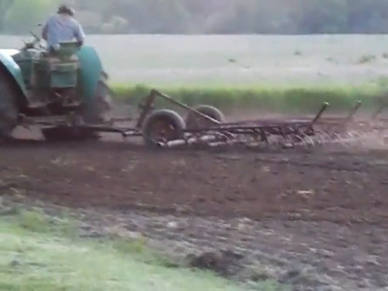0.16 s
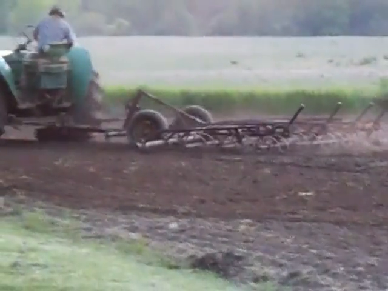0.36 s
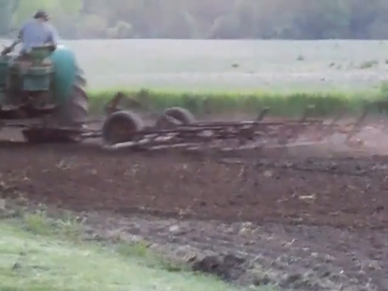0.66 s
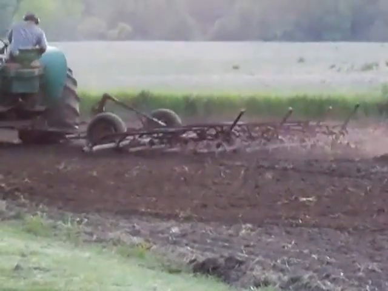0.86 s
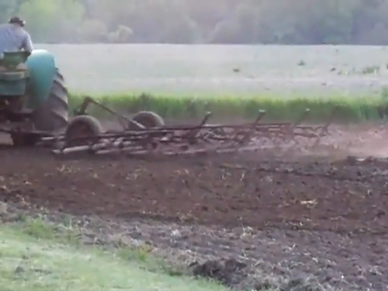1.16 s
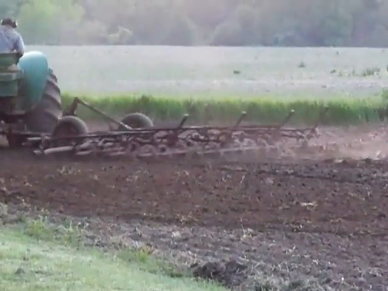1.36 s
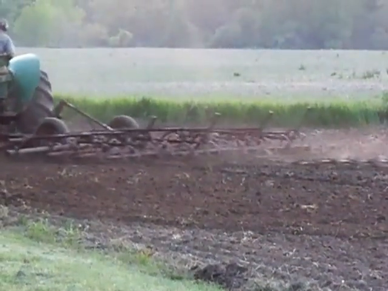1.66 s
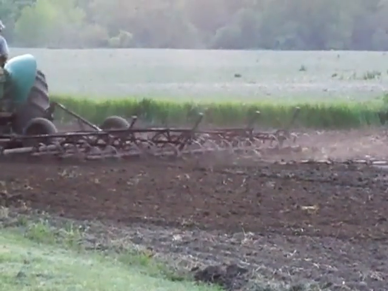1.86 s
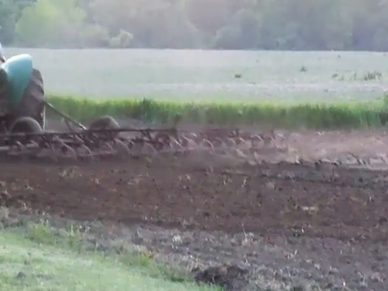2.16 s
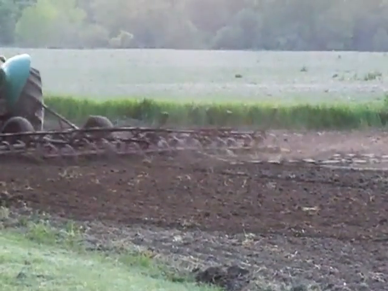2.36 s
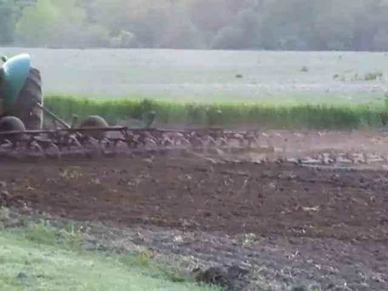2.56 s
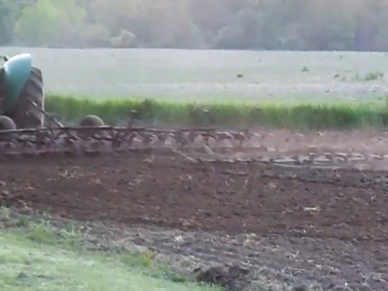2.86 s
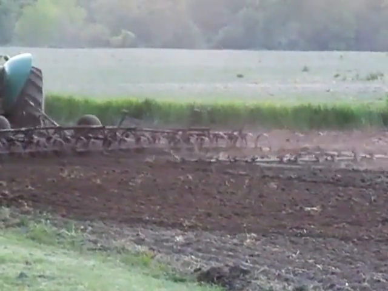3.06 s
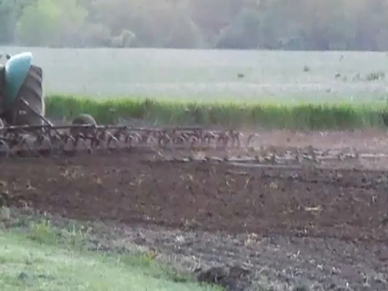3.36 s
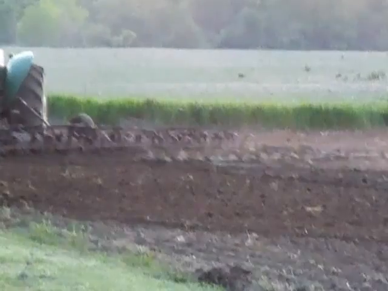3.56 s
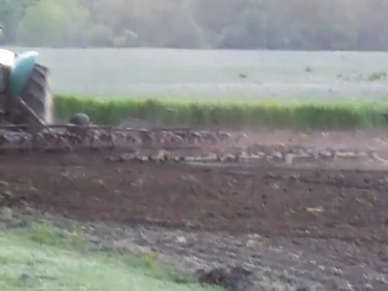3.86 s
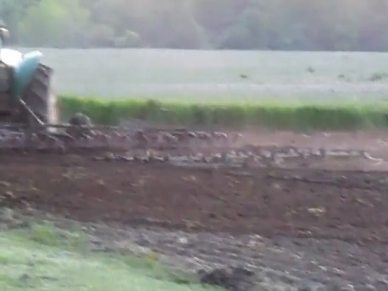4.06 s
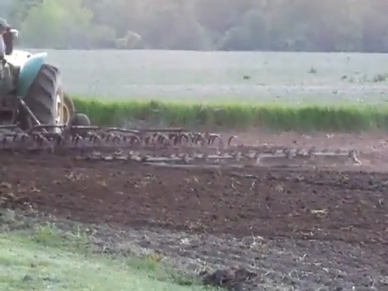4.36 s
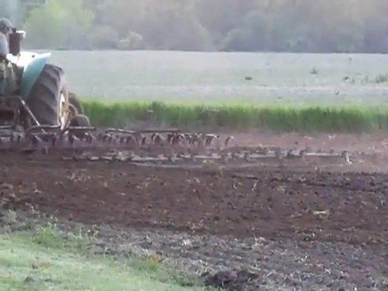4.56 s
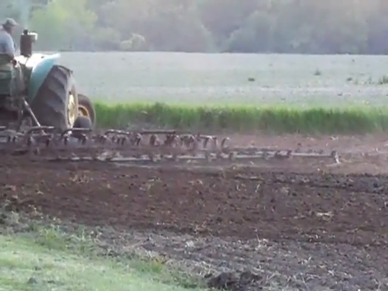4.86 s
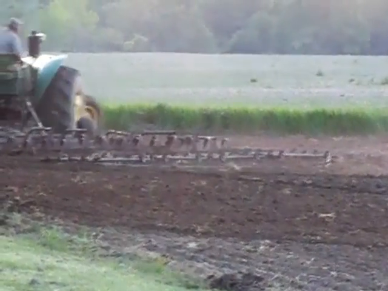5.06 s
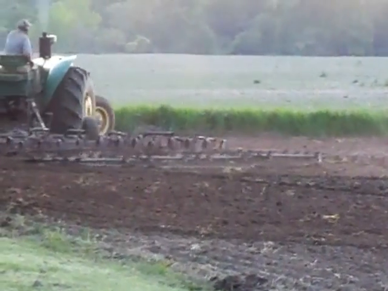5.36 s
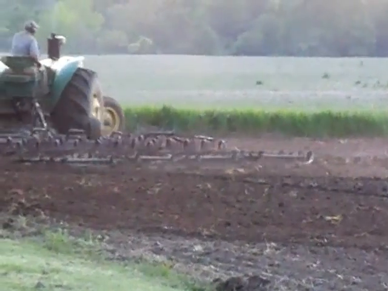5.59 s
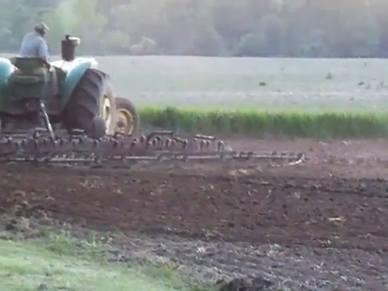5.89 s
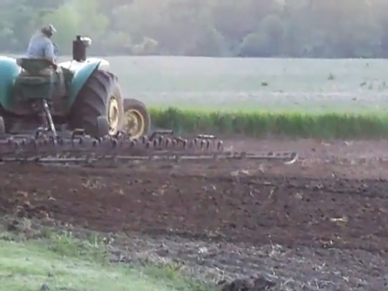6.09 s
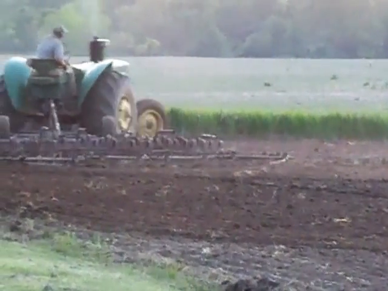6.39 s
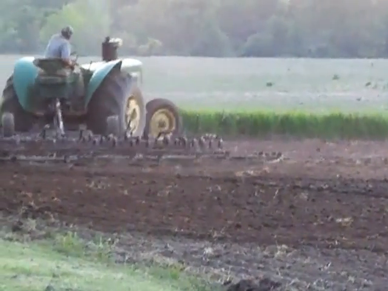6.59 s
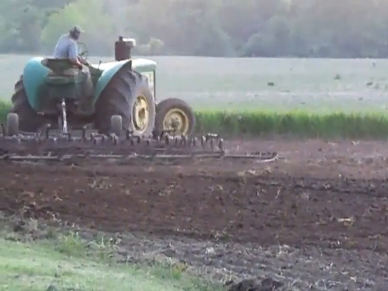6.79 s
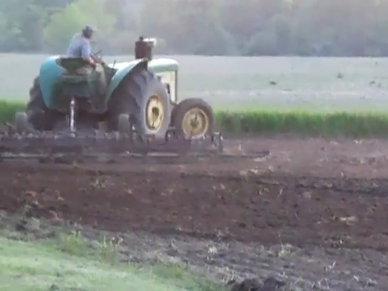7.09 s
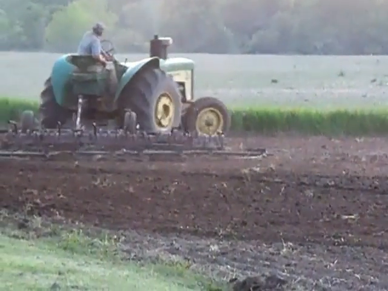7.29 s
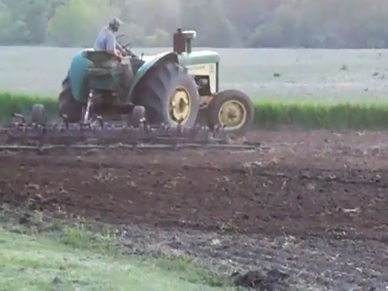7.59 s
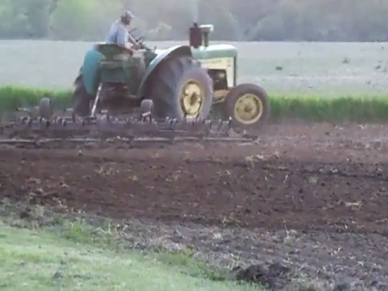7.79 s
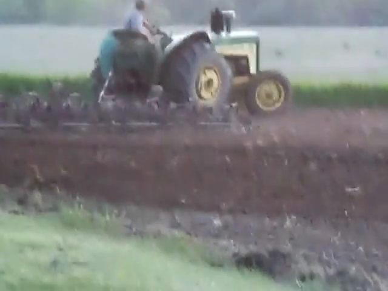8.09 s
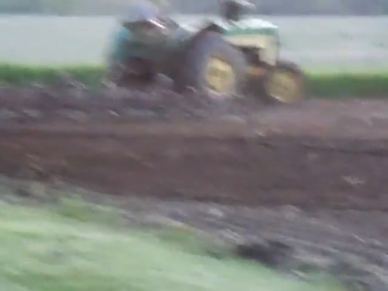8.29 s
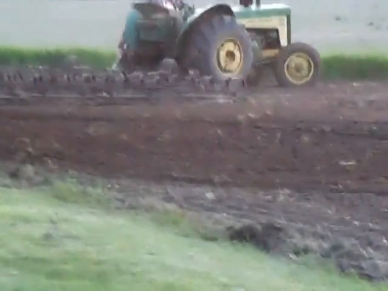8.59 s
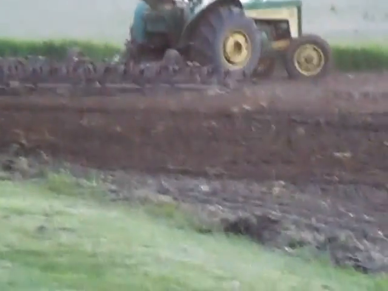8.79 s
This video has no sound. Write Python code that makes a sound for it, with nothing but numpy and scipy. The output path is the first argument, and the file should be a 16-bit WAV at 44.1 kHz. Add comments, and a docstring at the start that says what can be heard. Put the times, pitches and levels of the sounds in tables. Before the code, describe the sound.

An old two-cylinder diesel tractor works in an open field, heard from some tens of metres. Deep exhaust thumps come in close pairs with a longer gap, each with a short raspy, tinny blast. The engine slows and thumps harder midway, then recovers and runs slightly faster and lighter. Tyre rumble, gear clatter and a harrow's dry rustle lie underneath.

```python
"""End of a field: a slow two-cylinder diesel tractor turns, dragging a harrow, some tens of metres away.
Both cylinders fire about a quarter cycle apart: each sends a pressure thump down the stack and a blast
of gas, made of gated noise, that rings stack and tin. Gulps of intake air follow.
Under it, shaped noise makes rumbling tyres, clattering gears and a harrow rustling through dry soil."""
import sys
import numpy as np
from scipy import signal
from scipy.fft import rfft, irfft, next_fast_len
from scipy.io import wavfile
from scipy.ndimage import uniform_filter1d

SR = 44100
rng = np.random.default_rng(int(sys.argv[2]) if len(sys.argv) > 2 else 0)


def put_to_file(sound):
    """Save the sound as 16-bit audio at rate SR, in the file named by the first command-line argument."""
    columns = np.atleast_2d(sound).T  # one column per channel
    safe = np.clip(columns, -1, 1)
    whole_steps = np.round(safe * 32767)
    wavfile.write(sys.argv[1], SR, whole_steps.astype(np.int16))


def magnitude_from_level(level_db):
    """Linear magnitude for a level in decibels (20 dB per decade)."""
    exponent = np.asarray(level_db, float) / 20
    return 10 ** exponent


N = 394254
TIME_S = np.arange(N) / SR
MARGIN = SR // 2  # samples of run-in and of run-out


def along(table, s):
    """Interpolate every control of a table at the given moments."""
    at, *columns = np.transpose(table)
    return [np.interp(s, at, column) for column in columns]


def unit(x):
    """Scale to rms 1."""
    return x / np.sqrt(np.mean(x ** 2))


def ring(x, hz, width_hz):
    """Resonance with gain 1 at its centre."""
    return signal.lfilter(*signal.iirpeak(hz, hz / width_hz, fs=SR), x)


def fade(x, fade_ms):
    """Exponential decay of every spike; fade_ms is the time constant."""
    return signal.lfilter([1], [1, -np.exp(-1000 / (fade_ms * SR))], x)


def spikes(s, size):
    """Single samples at the given moments, with run-in and run-out."""
    out = np.zeros(N + 2 * MARGIN)
    at = np.round(s * SR).astype(int) + MARGIN
    np.add.at(out, at, size)
    return out


def heard(x):
    """Drop the run-in and run-out."""
    return x[MARGIN:MARGIN + N]


def coloured(spectrum):
    """Noise of rms 1 shaped by a spectrum, log-interpolated in frequency."""
    hz, db = np.transpose(spectrum)
    size = next_fast_len(N)
    bin_hz = np.arange(size // 2 + 1) * SR / size
    gain = magnitude_from_level(np.interp(np.log(bin_hz + 1), np.log(hz), db))
    return unit(irfft(rfft(rng.standard_normal(size)) * gain, size)[:N])


def walk(rate_hz):
    """Random levels held 1 / rate_hz and slewed twice; spread near 1."""
    hold = int(SR / rate_hz)
    steps = np.repeat(rng.standard_normal(N // hold + 1), hold)
    return 0.81 * uniform_filter1d(uniform_filter1d(steps, hold), hold)[:N]


# engine sags as the harrow bites in the turn, then picks up: (time [s], crank speed [rpm])
CRANK_SPEED = [(0.0, 934.3), (0.45, 930.2), (1.0, 943.1), (1.6, 932.7), (2.15, 932.2), (2.7, 915.3),
               (3.37, 934.4), (4.12, 873.8), (5.03, 854.6), (5.65, 915.4), (6.1, 925.8), (6.6, 930.5),
               (7.8, 966.5), (8.94, 980.5)]
FIRST_FIRING_S, SECOND_FIRING_SHARE = -.0229, .2425  # share of the cycle


def stroke_times(share):
    """Moments [s] of a stroke at this share of the two-turn cycle: all first cylinder, then all second."""
    s = np.arange(FIRST_FIRING_S, N / SR + .3, .001)
    cycles_per_s = along(CRANK_SPEED, s)[0] / 120
    # trapezoids of 1 ms
    cycles = np.append(0, np.cumsum(cycles_per_s[1:] + cycles_per_s[:-1]) * .0005)
    first = np.arange(int(np.interp(N / SR, s, cycles)) + 1) + share
    return np.interp(np.concatenate([first, first + SECOND_FIRING_SHARE]), cycles, s)


def add_pulses(out, s, db, width_ms):
    """Pressure pulses heard from afar: a dip, then an overshoot that settles slowly."""
    reach = np.arange(-400, 1200)
    u = reach / SR * 1000 / width_ms[:, None]
    dip = -np.exp(-u ** 2 / 2)
    overshoot = .55 * np.exp(-(u - 2.3) ** 2 / 2)
    settling = .2 * np.exp(-(u - 8.5) ** 2 / 8)
    at = np.round(s * SR).astype(int)[:, None] + MARGIN + reach
    np.add.at(out, at, magnitude_from_level(db)[:, None] * (dip + overshoot + settling))


# exhaust as load and heading change, levels before scatter and resonance gains:
# (time [s], thump level [dB], gas blast level [dB], blast treble tilt [dB/octave above 4.5 kHz],
#  whistle level [dB])
EXHAUST_LEVELS = [(0, -20.5, -26.5, -1.5, -32), (.5, -19.9, -28.5, -2, -31), (.9, -20, -27, 1.5, -33),
                  (1.2, -20, -27, -4, -33), (1.55, -18.2, -25.5, -3, -32), (2.0, -18, -26, -3, -32.5),
                  (2.2, -19.5, -26.5, 3.5, -34), (2.45, -19.4, -28, -1, -42), (3.1, -20, -32, -2, -38),
                  (3.35, -18.5, -31, -3, -33.5), (3.6, -17.7, -24, -7, -30.5), (4.1, -17.5, -25, -2.5, -37),
                  (4.6, -17.5, -26, -5.5, -35), (4.95, -16.5, -28, 1.5, -35), (5.3, -16.7, -26.5, -2, -26),
                  (5.55, -18, -24.5, -0.5, -35.5), (5.9, -17.5, -25.8, -2, -34),
                  (6.25, -19.5, -22.5, 1.3, -36), (6.6, -22.5, -27, 2.5, -34),
                  (6.85, -22.5, -28, -8, -38.5), (7.2, -22.1, -28, -1, -34.5), (7.35, -23, -29.5, 4, -34.5),
                  (8.15, -22.7, -27, 1, -38), (8.45, -22, -27.5, -2, -33.5),
                  (8.94, -21.5, -26.5, -1.5, -37)]
# as the engine lugs and frees up with crank speed: (time [s], thump width [ms], second cylinder re first [dB],
# pipe echo re thump [dB], intake re thump [dB], extra gain of the first low resonance [dB])
STACK_UNDER_LOAD = [(0, 1.35, -1, -9.5, -7, 1), (3.3, 1.4, -.5, -9, -6.5, 0), (4.1, 1.5, 0, -6, -12, -3),
                    (5.3, 1.5, 0, -6, -12, -3), (5.8, 1.4, -.5, -10, -9, 1), (7, 1.5, -2.5, -9, -8, 5),
                    (8.94, 1.5, -2.5, -9, -8, 5)]
# thump returns inside the exhaust pipe: (lag [ms], level re pipe echo [dB], widening [ratio])
PIPE_ECHOES = [(22.0, 0, 1.5), (41.0, -4, 1.4)]
# low resonances rung by the pulses, the first is the boom: (frequency [Hz], width [Hz], gain [dB])
MUFFLER_MODES = [(55, 10, -6), (29, 10, -5), (95, 25, -12), (128, 25, -9)]
FIRST_GULP_SHARE = .565  # share of the cycle
THUMP_SCATTER_DB = 0.6  # from firing to firing


def thumps():
    """Firing pulses, their returns in the pipe and the intake gulps, ringing low resonances."""
    out = np.zeros(N + 2 * MARGIN)
    fired, gulped = stroke_times(0), stroke_times(FIRST_GULP_SHARE)
    chance = rng.standard_normal((4, len(fired)))
    db = along(EXHAUST_LEVELS, fired)[0] + THUMP_SCATTER_DB * chance[3]
    second = np.repeat([0, 1], len(fired) // 2)
    width_ms, second_db, echo_db, intake_db, _ = along(STACK_UNDER_LOAD, fired)
    add_pulses(out, fired, db + second * second_db, width_ms)
    for (lag_ms, gain_db, widening), scatter in zip(PIPE_ECHOES, chance):
        return_db = db + echo_db + gain_db + .7 * scatter
        add_pulses(out, fired + lag_ms / 1000, return_db, widening * width_ms)
    # the second cylinder draws on air already moving, so its gulp is softer
    gulp_db = db + intake_db - 5 * second + .7 * chance[2]
    add_pulses(out, gulped, gulp_db, 1.2 * width_ms)
    boom, *rings = [magnitude_from_level(gain_db) * heard(ring(out, hz, width_hz))
                    for hz, width_hz, gain_db in MUFFLER_MODES]
    boom_db = along(STACK_UNDER_LOAD, TIME_S)[-1]
    return heard(out) + magnitude_from_level(boom_db) * boom + sum(rings)


# clatter level as the tractor turns; also steers stack ring and harrow: (time [s], level [dB])
TURN_LEVEL = [(0, -37), (1.07, -38), (1.7, -36), (2.3, -39), (3.05, -39), (3.65, -35.5), (4.2, -36),
              (5.6, -35.5), (6.0, -36.5), (6.45, -38.5), (7.15, -39.5), (8.2, -38), (8.94, -35)]
# stack and tin rung by the gas blast: (frequency [Hz], width [Hz], gain [dB], fade [ms])
BODY_MODES = [(681.8, 98, -3.5, 6.6), (800, 130, -4.5, 10.3), (1338, 213, -1, 5.4), (1790, 380, -5, 11.7),
              (2484, 85, -13, 10.3), (2966, 330, -9.5, 8.9), (3240, 680, -10, 5.3), (3460, 79, -19.5, 18),
              (3750, 640, -9.5, 10.6), (5073, 600, -5, 10.9), (5655, 360, -8, 5.7), (6650, 880, -5, 6.5),
              (7370, 450, -9, 5.4), (7760, 1200, -2.5, 3.1), (8790, 550, 0, 2.98), (9560, 510, -5, 2.45),
              (10580, 1250, 1.5, 3.53), (12160, 2200, -4, 2.9)]
# edge tone of the stack: (frequency [Hz], width [Hz], gain [dB], fade [ms])
WHISTLE_MODES = [(1494, 47, -0.5, 9.2), (1550, 58, -5, 24.8), (1600, 20, -14.5, 14.5)]
STACK_RING_DB = 4.5  # over the clatter
BLAST_SCATTER_DB, RING_SCATTER_DB = 0.84, 0.7  # from firing to firing
GULP_HISS_DB, SECOND_GULP_DB = -25.5, -1  # under the blast; over the first gulp
CRACK_DB, CRACK_DB_PER_OCTAVE = -16.0, 1  # at 1 kHz; slope over frequency


def blasts():
    """Turbulent gas rushes out for some ms after each firing; every blast favours other resonances."""
    fired, gulped = stroke_times(0) - .0008, stroke_times(FIRST_GULP_SHARE) + .00077
    second = np.repeat([0, 1], len(fired) // 2)
    modes = BODY_MODES + WHISTLE_MODES
    colours = rng.standard_normal((len(modes), len(fired)))
    hiss_chance = rng.standard_normal(len(fired))
    strength = rng.standard_normal((4, len(fired)))
    _, jet_db, treble_db, whistle_db = along(EXHAUST_LEVELS, fired)
    jet_db = jet_db + BLAST_SCATTER_DB * strength[0]
    treble_db = treble_db + BLAST_SCATTER_DB * strength[1]
    stack_db = along(TURN_LEVEL, fired)[0] + STACK_RING_DB + RING_SCATTER_DB * strength[2]
    whistle_db = whistle_db + RING_SCATTER_DB * strength[3]
    # eddies make the flow flutter from ms to ms
    eddies = uniform_filter1d(rng.standard_normal(N), size=40) * np.sqrt(40)
    flutter = unit(magnitude_from_level(1.15 * eddies))
    rush = int(0.0079 * SR)  # valve-open time in samples
    gas = rng.standard_normal(N)
    out = 0
    for mode, colour in zip(modes, colours):
        hz, width_hz, gain_db, fade_ms = mode
        if mode in WHISTLE_MODES:
            blast_db = whistle_db
        elif hz < 2100:
            blast_db = stack_db
        else:
            blast_db = jet_db + treble_db * max(np.log2(hz / 4500), 0)
        # the intake hisses faintly at each gulp, in the treble only
        hiss_db = blast_db + GULP_HISS_DB + SECOND_GULP_DB * second + 2.1 * hiss_chance
        hiss = (hz > 6300) * magnitude_from_level(hiss_db)
        kick = spikes(fired, magnitude_from_level(blast_db + 1.3 * colour)) + spikes(gulped, hiss)
        # flow builds while the valve stands open, then dies to a faint tail
        dying = fade(kick, fade_ms) + magnitude_from_level(-23.5) * fade(kick, 23.3)
        held = uniform_filter1d(dying, rush, origin=(rush - 1) // 2)
        # the first crack of the valve is sudden
        crack = magnitude_from_level(CRACK_DB + CRACK_DB_PER_OCTAVE * np.log2(hz / 1000)) * dying
        flow = heard(held + crack) * flutter
        # each resonance hears other eddies; a steep skirt keeps the valleys between them hollow
        rung = ring(np.roll(gas, int(hz)) * flow, hz, width_hz)
        rung = ring(rung, hz, 3.3 * width_hz)
        out = out + magnitude_from_level(gain_db) * np.sqrt(SR / width_hz) * rung
    return out


# tyre noise spectrum, scaled to rms 1 on use: (frequency [Hz], relative density [dB])
RUMBLE_SPECTRUM = [(12, -32), (20, -9), (49, -5), (109, -6.5), (186, -2), (317, -15.5), (450, -20),
                   (580, -59), (990, -120)]
RUMBLE_DB = -21  # over the thump


def tyre_rumble():
    """Tyres: low noise that follows the thump level."""
    return coloured(RUMBLE_SPECTRUM) * magnitude_from_level(along(EXHAUST_LEVELS, TIME_S)[0] + RUMBLE_DB)


# gear and tin spectrum, scaled to rms 1 on use: (frequency [Hz], relative density [dB])
CLATTER_SPECTRUM = [(260, -33), (450, -11.5), (645, -1.5), (798, -3), (1040, -7), (1380, -3.5), (1520, -4),
                    (1690, -7), (2150, -11.5), (2450, -9), (2600, -12.5), (3380, -32), (5720, -120)]


def gear_clatter():
    """Gears and tin: mid-band noise with an unsteady level."""
    return coloured(CLATTER_SPECTRUM) * magnitude_from_level(along(TURN_LEVEL, TIME_S)[0] + 1.67 * walk(22))


# tines in soil, scaled to rms 1 on use: (frequency [Hz], relative density [dB])
RUSTLE_SPECTRUM = [(1180, -17), (2000, -7), (2950, 5), (4220, 1), (5100, 0.5), (6070, -1), (10700, -8.5),
                   (12600, -8.5), (14500, -18)]
# light taps of harrow links: (time [s], level before ring [dB re +37.5 dB], ring frequency [Hz])
LINK_TAPS = [(8.4956, -22, 3520), (8.5154, -32, 3700), (8.5374, -27, 4260), (8.5524, -27, 3780)]
RUSTLE_DB = -3.5  # over the clatter


def harrow():
    """Tines rustle through clods as unsteady bright noise; their links tap as struck resonances."""
    rustle_db = along(TURN_LEVEL, TIME_S)[0] + RUSTLE_DB + 2.54 * walk(40)
    rustle = coloured(RUSTLE_SPECTRUM) * magnitude_from_level(rustle_db)
    # 37.5 dB offsets most of the loss of a single sample in a narrow ring
    taps = sum(ring(heard(spikes(np.array([s]), magnitude_from_level(db + 37.5))), hz, 66) for s, db, hz in LINK_TAPS)
    return rustle + taps


def scene():
    """All sources sum at one microphone over open ground."""
    return (thumps() + blasts() + tyre_rumble() + gear_clatter() + harrow())[None]


def roll_off(x):
    """The treble ends steeply here."""
    return signal.sosfilt(signal.butter(12, 15260, fs=SR, output="sos"), x)


def record(dry):
    """The camera cuts the deepest bass and the top."""
    x = signal.sosfilt(signal.butter(2, 12, "high", fs=SR, output="sos"), dry)
    x = signal.sosfilt(signal.butter(2, 11500, fs=SR, output="sos"), x)
    x = signal.sosfilt(signal.cheby1(12, .5, 14000, fs=SR, output="sos"), x)
    return roll_off(x)


dry = scene()
out = record(dry)
put_to_file(out)
```